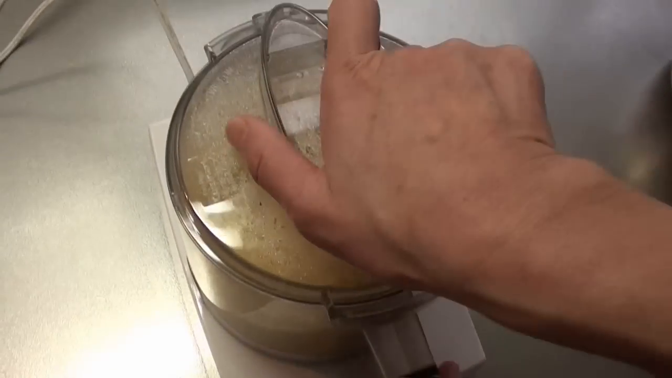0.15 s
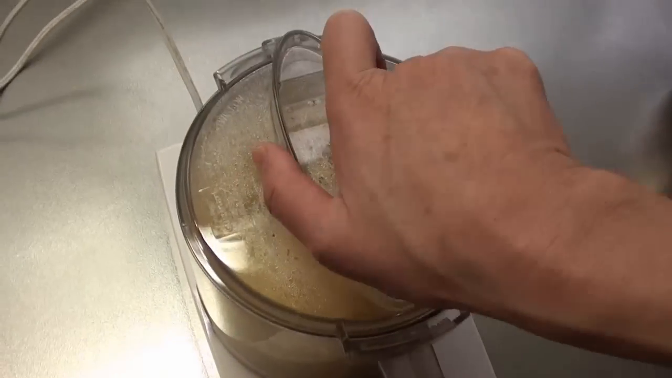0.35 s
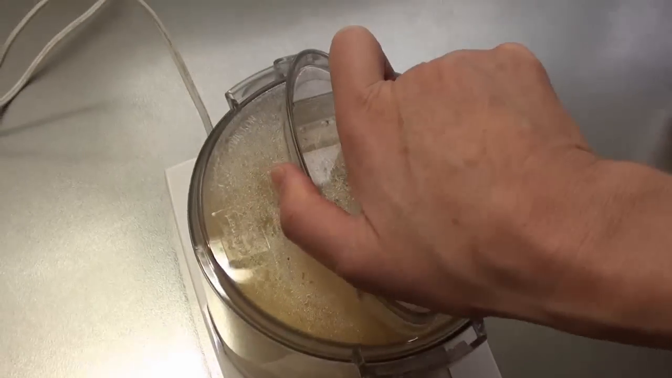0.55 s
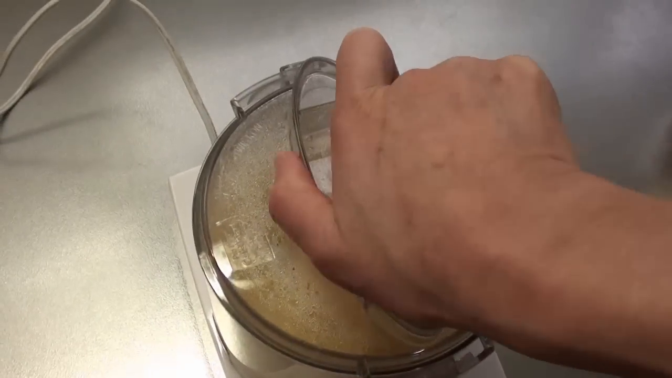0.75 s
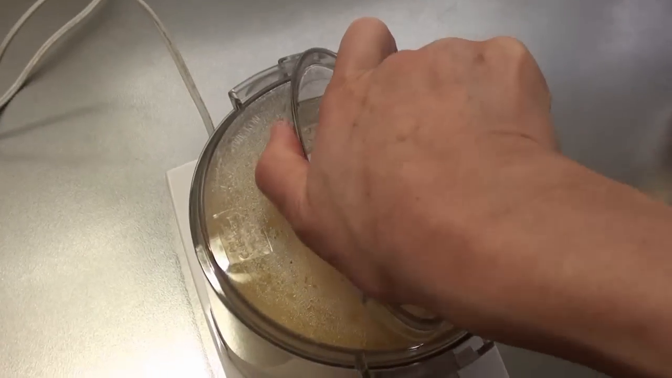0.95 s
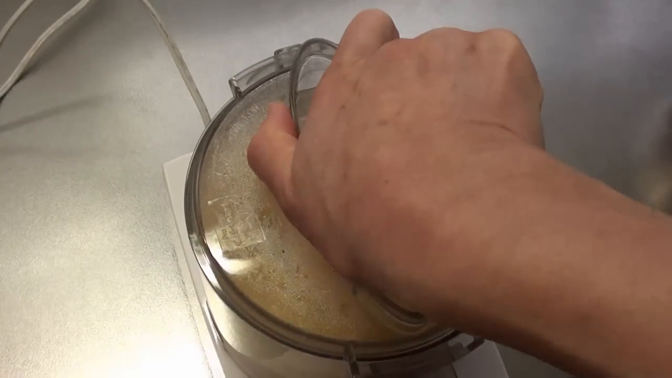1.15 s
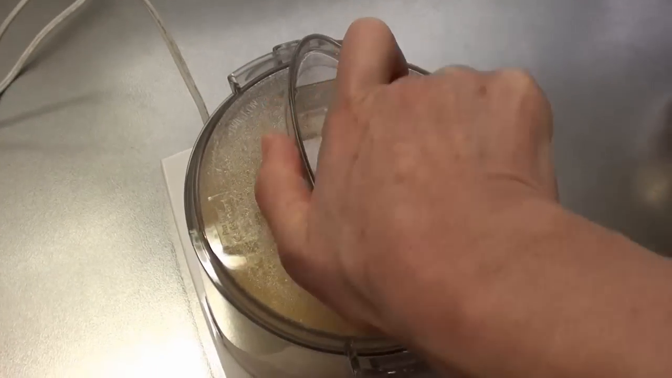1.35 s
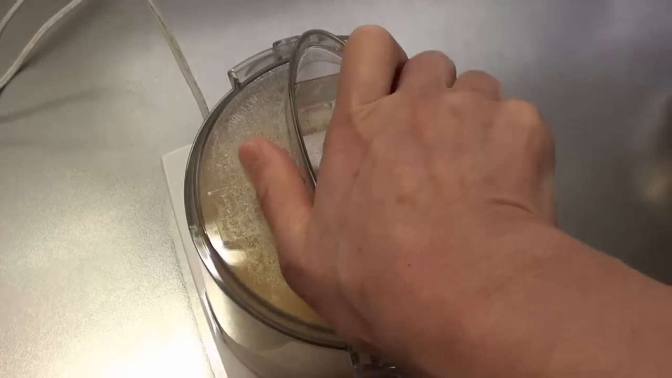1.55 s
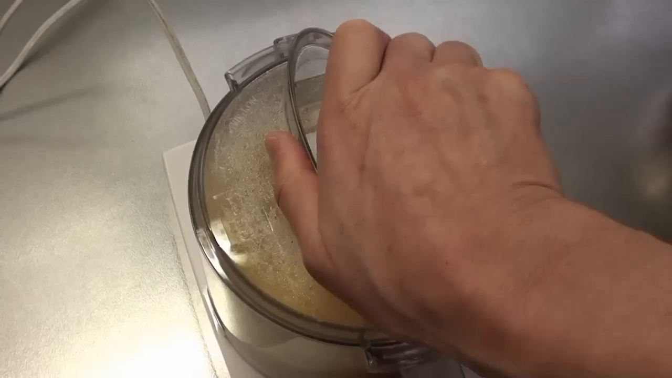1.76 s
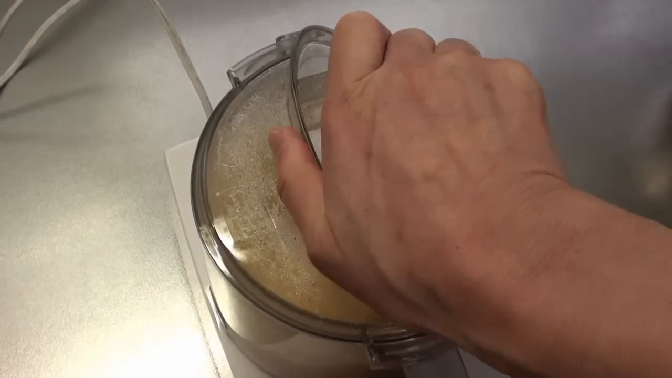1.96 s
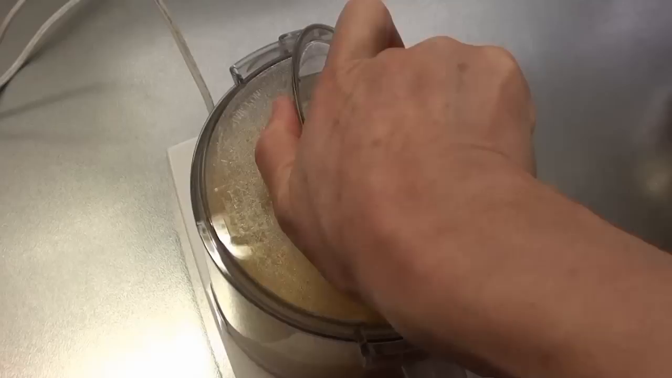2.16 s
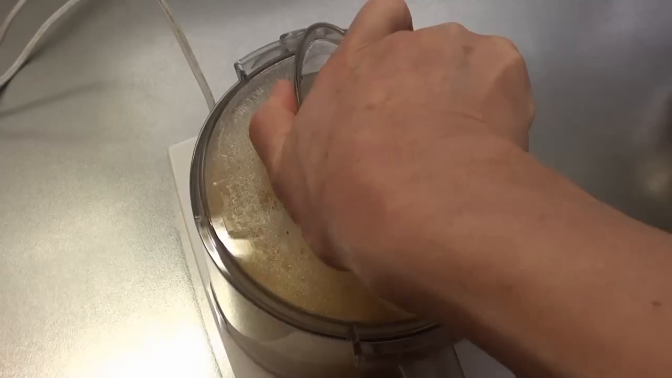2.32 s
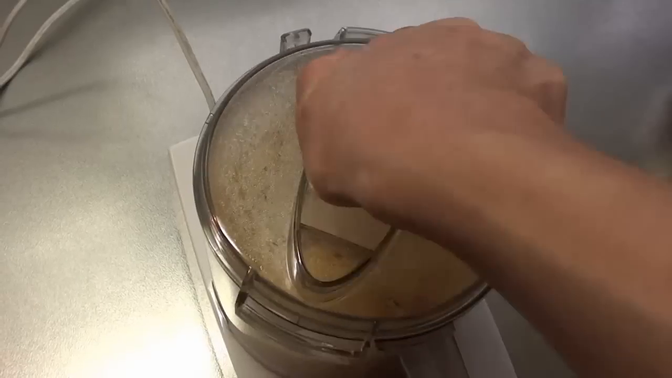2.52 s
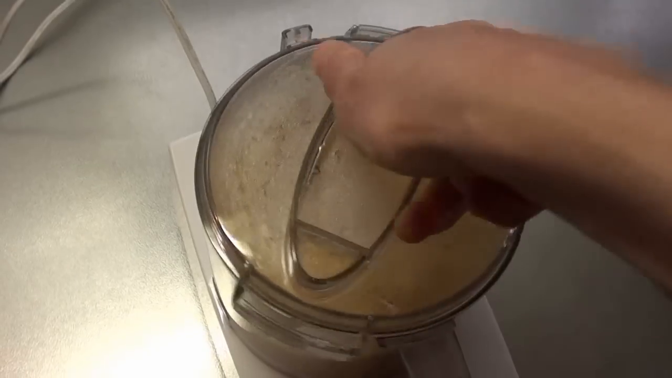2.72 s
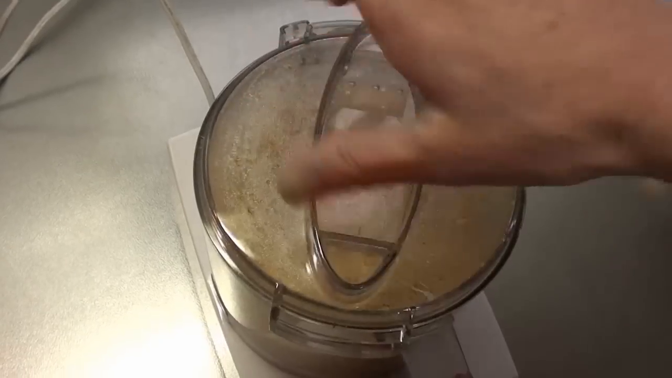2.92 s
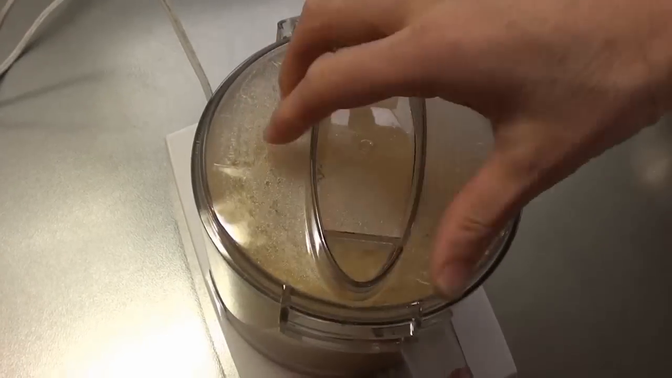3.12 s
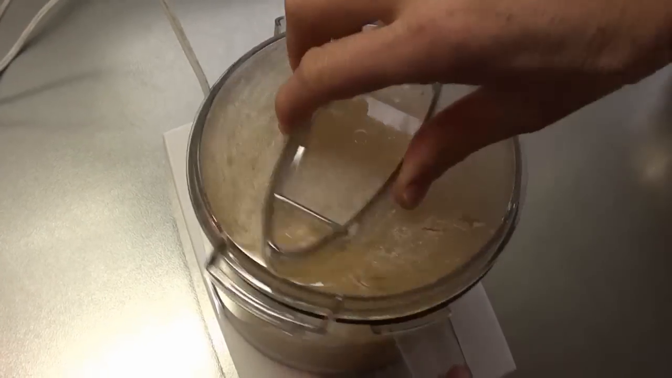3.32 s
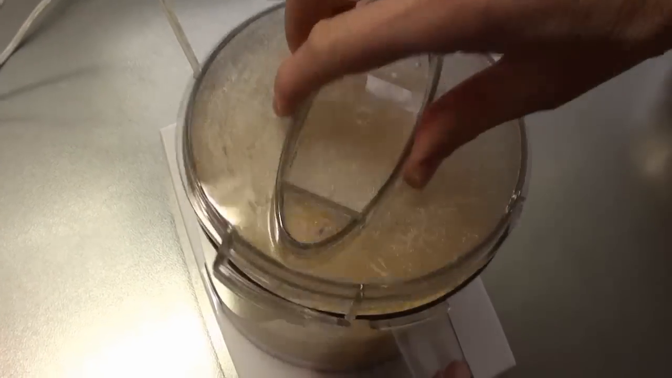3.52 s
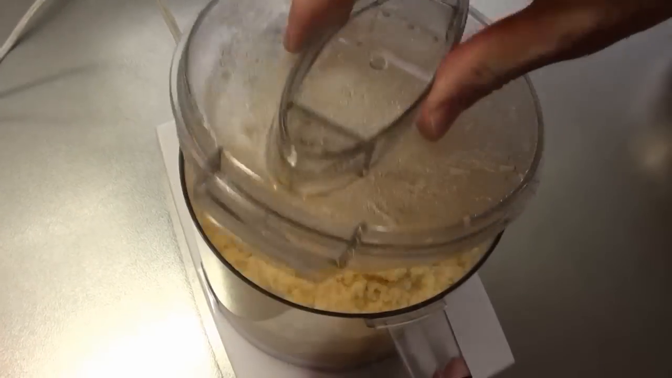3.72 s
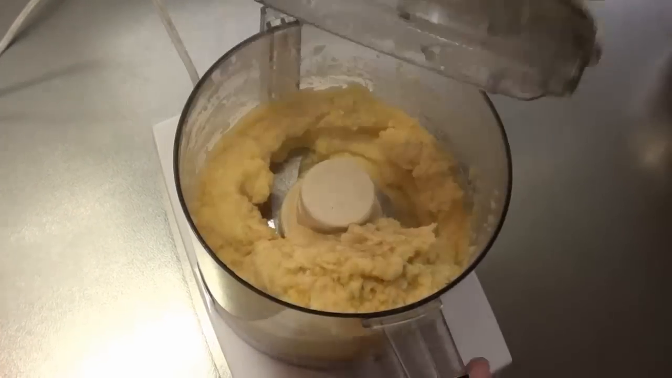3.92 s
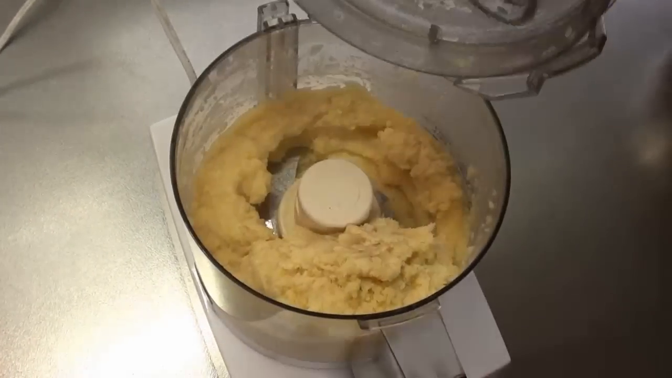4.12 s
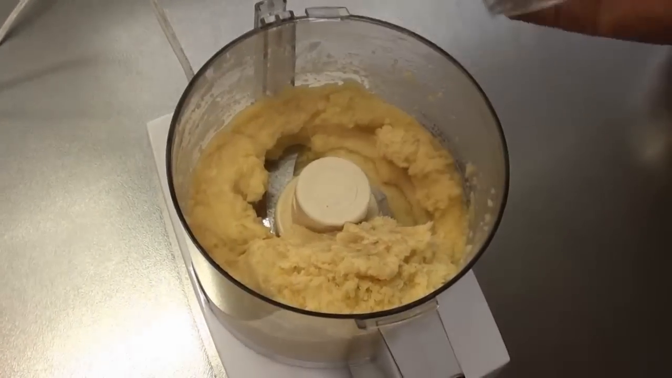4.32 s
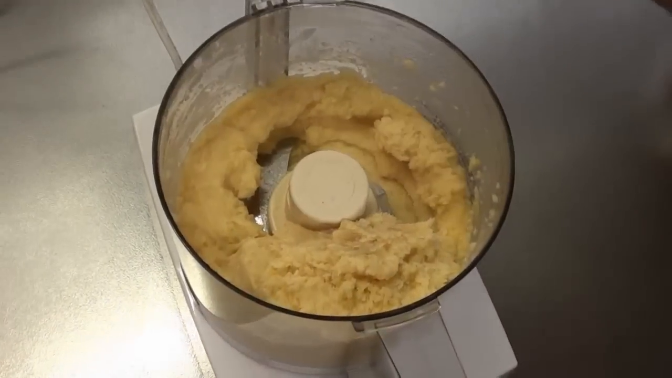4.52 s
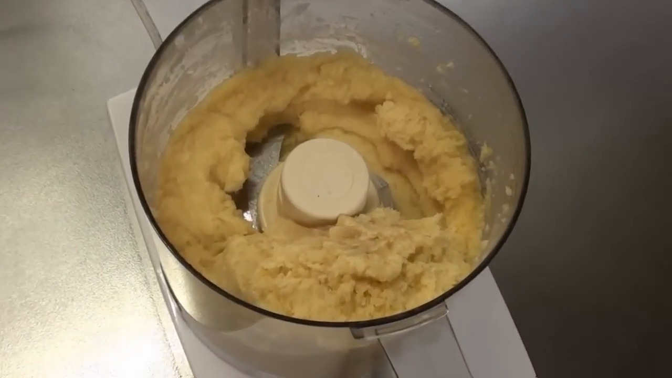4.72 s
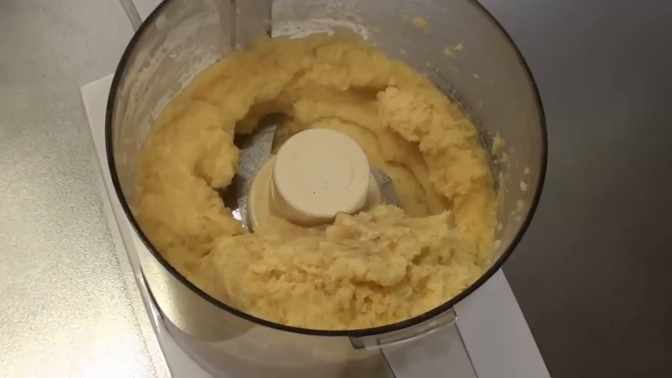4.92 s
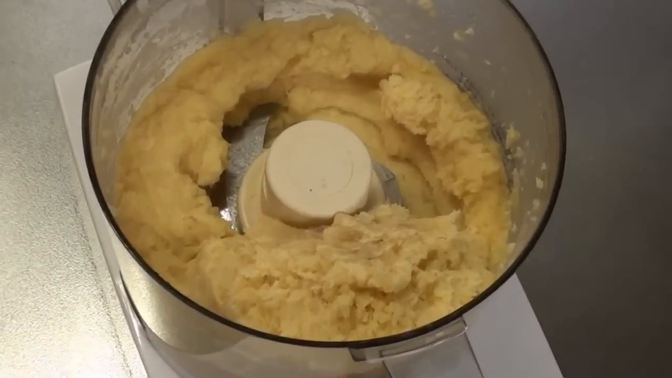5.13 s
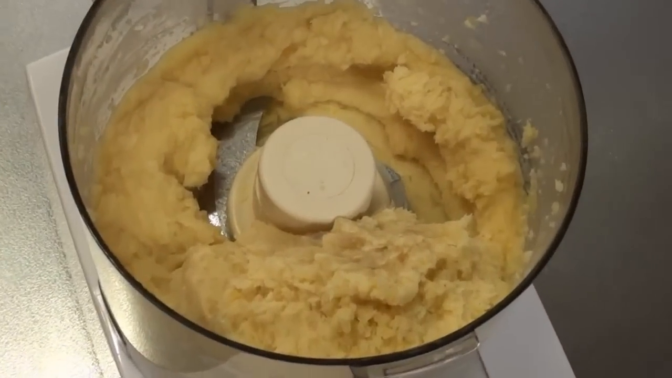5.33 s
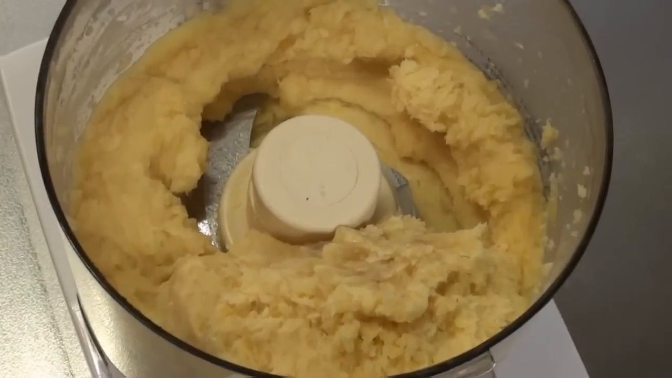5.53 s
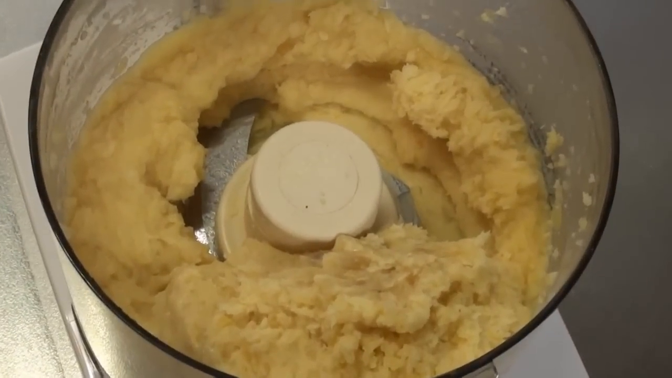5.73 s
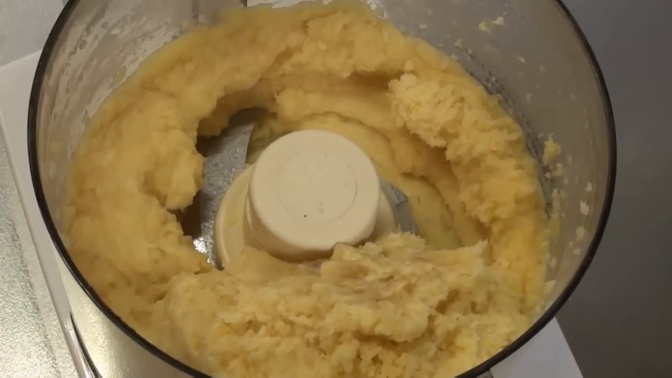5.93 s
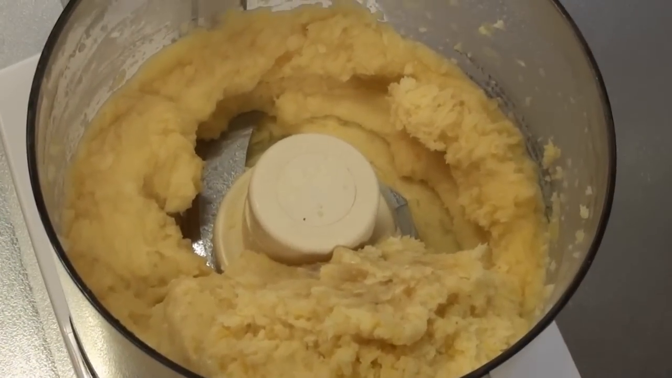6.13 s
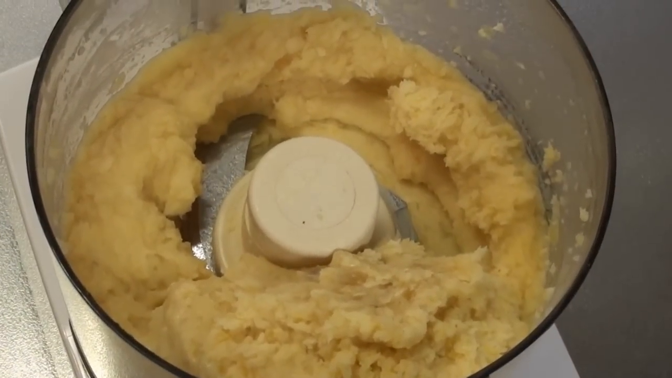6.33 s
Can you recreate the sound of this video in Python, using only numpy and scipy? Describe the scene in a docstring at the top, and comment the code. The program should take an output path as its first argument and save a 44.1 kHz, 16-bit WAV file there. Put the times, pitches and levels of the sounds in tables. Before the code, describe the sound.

Hard plastic knocks and short rim scrapes with tiny latch squeaks, ending in near silence over faint room hiss and appliance hum.

```python
"""In a quiet kitchen, a hand twists the plastic lid of a food processor off its latch and lifts it from the bowl.
Knocks and clicks are short blows with a dying rattle that set the tuned modes of lid and bowl ringing.
The scraping rim is a dense stream of uneven grains driving the same modes, and the latch squeaks by
stick-slip as a wavering stack of partials. Noise-like echoes make the room ring briefly, over a soft hiss
with faint, steady appliance tones."""
import sys
import numpy as np
from scipy import signal
from scipy.io import wavfile

SR = 44100
rng = np.random.default_rng(int(sys.argv[2]) if len(sys.argv) > 2 else 0)


def persist_wave(psi):
    """Save psi, clipped to +-1, as 16-bit WAV."""
    counts = np.round(np.clip(psi, -1, 1) * 32767).astype(np.int16)
    wavfile.write(sys.argv[1], SR, np.atleast_2d(counts).T)


def invert_db(x):
    """Field ratio 10**(x/20) for x, a level in decibels (scalar or array-like)."""
    u = np.asarray(x, float) / 20
    return 10 ** u


N = 280816
TIME = np.arange(N) / SR   # seconds

# Centres of the five ranges of pitch in which blows and grains are described. Each entry: frequency in Hz.
COLOUR_HZ = [250, 850, 2000, 4500, 8000]
SUDDEN_S, GENTLE_S = 0.0015, 0.0072   # a quick and a soft fade, in seconds


def rms_one(x):
    """Scale to an average strength (rms) of 1."""
    return x / np.sqrt(np.mean(x ** 2) + 1e-20)


def in_time(rows):
    """Turn rows of (seconds, value) into a curve over all samples."""
    return np.interp(TIME, *np.transpose(rows))


def sounding(start, length, rise_s, fall_s):
    """1 while the event lasts, with a fade before it and another after it."""
    end = start + length
    return np.interp(TIME, [start - rise_s, start, end, end + fall_s], [0, 1, 1, 0])


def at_hz(points, hz):
    """Read a curve of (Hz, value) at one frequency, with pitch on a logarithmic axis."""
    point_hz, values = np.transpose(points)
    return np.interp(np.log(hz), np.log(point_hz), values)


def drift(rate):
    """Random wandering of spread 1: noise through two equal one-pole low-passes at rate Hz."""
    r = np.exp(-2 * np.pi * rate / SR)
    noise = rng.standard_normal(N + SR)
    settled = signal.lfilter([1], [1, -2 * r, r * r], noise)[SR:]   # skip the first second
    return rms_one(settled)


def blend(ranges, hz):
    """Cross-fade between the five ranges of pitch to get the value at one frequency."""
    place = np.interp(np.log(hz), np.log(COLOUR_HZ), np.arange(5))
    k = min(int(place), 3)
    return ranges[k] + (place - k) * (ranges[k + 1] - ranges[k])


def ring(force, hz, t60):
    """One mode of a solid part: a unit click starts a sine of height 1 that falls 60 dB in t60 seconds."""
    r = invert_db(-60 / (max(t60, 0.0005) * SR))
    w = 2 * np.pi * hz / SR
    return signal.lfilter([0, np.sin(w)], [1, -2 * r * np.cos(w), r * r], force + 1e-18)


def room_tone():
    """Stereo hiss in half-octave bands, each with its own level and likeness, plus appliance tones."""
    # Colour of the hiss. Each row: frequency in Hz, relative density in dB.
    hiss_colour = [(15, -61), (25, -37), (60, -15.5), (90, -2.5), (118, -13), (202, -4.5), (237, -3.5),
                   (438, -7), (811, -8), (2240, -12.5), (2430, -13), (2630, -15), (4150, -13), (13800, -20),
                   (15000, -23)]
    # Loudness of the whole hiss. Each row: time in seconds, level in dB.
    hiss_level = [(0.0, -54), (1.5, -54), (3.6, -53.5), (6.37, -58)]
    # How alike left and right are. Each row: frequency in Hz, likeness (1 same, 0 unrelated, -1 opposite).
    likeness = [(60, 1), (180, 0.8), (550, 0.085), (1650, 0.15), (4970, 0.89), (15000, 0.77)]
    # Steady appliance tones. Each row: frequency in Hz, level in dB before a slight waver.
    tone_table = [(118.4, -73), (839.8, -76), (2519, -71), (8393, -77)]
    hiss, edges = 0, 22 * 2 ** np.arange(0, 9.6, 0.5)
    white = rng.standard_normal((2, 2, N))   # neighbouring bands use different noise
    for k, (low, high) in enumerate(zip(edges, edges[1:])):
        band = signal.butter(2, [low, high], "band", fs=SR, output="sos")
        mid, side = signal.sosfilt(band, white[k % 2])
        hz = np.sqrt(low * high)
        alike = np.clip(at_hz(likeness, hz), -1, 1)
        stereo = np.sqrt(1 + alike) * mid + np.sqrt(1 - alike) * side * [[1], [-1]]
        hiss = hiss + invert_db(at_hz(hiss_colour, hz)) * stereo
    level_db = in_time(hiss_level) + 0.18 * drift(4)
    waver = invert_db(0.87 * drift(6))
    tones = sum(np.sqrt(2) * invert_db(db) * np.sin(2 * np.pi * hz * TIME) for hz, db in tone_table)
    return invert_db(level_db) * rms_one(hiss) + waver * tones


def plastic():
    """Every knock is a blow plus a dying rattle; blows and friction drive the modes of bowl and lid."""
    # Plastic knocking on plastic. Each row: start in seconds, blow on the dome of the lid in dB,
    # push into the bowl in dB, hardness as treble gained in dB, snap of the latch tab near 4.5 kHz in dB.
    knocks = [(0.105, -31.5, -42.5, -7.5, -11), (0.287, -47.5, -45.5, 7, 6), (0.339, -40.5, -42, -1.5, -7),
              (0.402, -35.5, -43, -27, -16.5), (0.412, -43, -50, -14, -8.5), (0.44, -55, -44, -13, -15),
              (0.509, -55, -45, -15, -16), (0.545, -61, -46.5, -12, -9), (0.57, -59, -46, -12, -13),
              (0.634, -42, -46, -16, -20), (0.708, -43, -50, -16, -13), (0.734, -62, -46, -9, -13),
              (0.753, -60, -44, -10, -12), (0.768, -54, -47, -8, -8), (0.802, -41, -49, 9, 9),
              (0.806, -27.5, -36, 5.5, 10), (0.829, -13.5, -23, -4.5, -11.5), (0.913, -35.5, -39, -7.5, -3),
              (0.99, -28.5, -36, -8, 4.5), (1.085, -28, -37.5, -1, 11.5), (1.276, -37.5, -43, -21, -7),
              (1.37, -23.5, -35.5, 0.5, -6), (1.426, -29.5, -40, -4.5, -5), (1.474, -46, -46, -1, 5),
              (1.66, -51, -50, -4, 1), (1.681, -37, -38, 0, -7), (1.701, -25.5, -31.5, -4, -3),
              (1.721, -29.5, -35.5, 13, 16), (1.755, -23.5, -28.5, 1, 11), (1.785, -21.5, -28, -9, -10),
              (1.933, -23, -38, -5.5, 1), (1.961, -33, -44, -9, -10), (2.095, -26.5, -46, -8, -5),
              (2.144, -29, -40, -2.5, -13), (2.153, -22, -29.5, 1, -13), (2.192, -41, -44, -16, -7),
              (2.211, -35.5, -43, -13, 4), (2.235, -26, -50, -19, 9.5), (2.267, -26, -52, -5, 13),
              (2.35, -17, -35.5, -8.5, 6.5), (2.533, -27.5, -33, -4, 9), (2.567, -20, -22.5, -1, -6),
              (2.704, -30, -32.5, -11, -10), (2.787, -29.5, -35.5, -5.5, -2), (2.808, -26, -36, -11, -20),
              (2.831, -8.5, -25.5, -15.5, -9), (2.905, -37, -38, -6, 0), (2.977, -50, -47, 4, -6),
              (3.008, -37.5, -37.5, 2, -16), (3.09, -44.5, -51, -7, -2), (3.151, -14, -19.5, -28, -17.5),
              (3.259, -45, -48, -8, -9), (3.279, -26, -26, -15, -8), (3.291, -14, -25, -17, -13),
              (3.373, -22.5, -33, -11, -7), (3.431, -26, -36, -7.5, -22), (3.456, -29, -44, -20, -20),
              (3.488, -20, -35.5, -18, -13.5), (3.574, -46, -53, -15, -16), (3.596, -41, -48, 3.5, -2),
              (3.614, -46, -51, 4, -9), (3.859, -32, -55, -28, -16.5), (3.937, -42, -38, 0, -19),
              (3.943, -51, -45, 17, -20), (3.965, -39.5, -41, 3, -17), (5.24, -60, -69, -4, 12),
              (5.779, -53, -57, -2, 4)]
    # Modes of the bowl. Each row: frequency in Hz, relative level in dB, time to fall 60 dB in seconds,
    # gain in dB on the driving force for a fully free lid.
    bowl_modes = [(97.8, -27.5, 0.091, 14), (176, -11, 0.015, 5), (224.8, 3.5, 0.12, -5),
                  (273, 3, 0.047, -3.5), (360.3, -3, 0.079, 11.5), (454, -6, 0.16, 0)]
    # Modes of the lid, sharp ones first, then broad ones of the damped contact.
    # Each row: frequency in Hz, relative level in dB, longest time to fall 60 dB in seconds.
    lid_modes = [(551, -7, 0.046), (665, -4.5, 0.048), (825, -8, 0.013), (837.4, -3, 0.045),
                 (1025, -15.5, 0.039), (1304, -3.5, 0.029), (1434, -3, 0.028), (1630, -18.5, 0.018),
                 (1894, -3, 0.032), (2160, -6.5, 0.019), (2695, 1, 0.031), (2790, 2, 0.022),
                 (3230, -2.5, 0.0073), (3780, 4.5, 0.0092), (4077, -2.5, 0.0096), (4640, -2, 0.0043),
                 (5377, -1, 0.0055), (5860, -4, 0.0029), (6850, 2.5, 0.017), (6900, -1.5, 0.021),
                 (7750, -5, 0.0026), (8520, -2, 0.02), (773, 6, 0.0073), (1889.4, 7.5, 0.0095),
                 (3530, 8.5, 0.0023), (6240, 3.5, 0.001), (8600, 3.5, .0012)]
    # How loose the lid is. Each row: time in seconds, looseness (0 latched, 1 free).
    looseness = [(0.9, 0.26), (2.0, 0.31), (2.6, 0.63)]
    # How well a blow reaches the five ranges of pitch. Each entry: gain in dB.
    blow_coupling = [3, -1, -3.5, 1, 8.5]
    # Shares that the modes near 2 kHz take. The entries: share of the hardness, share of the snap.
    rim_shares = [0.14, 0.25]
    rattle_s = 0.0018   # time constant of the chatter after a knock
    held_cycles = 30   # the hand stops any lid mode within this many cycles

    s, dome_db, push_db, hard_db, snap_db = np.transpose(knocks)
    rim_db = dome_db + np.dot(rim_shares, [hard_db, snap_db])
    colour_db = np.array([push_db, dome_db, rim_db, dome_db + snap_db, dome_db + hard_db])
    colour_db = colour_db + np.c_[blow_coupling]

    at = np.round(s * SR).astype(int)
    last = np.maximum(np.searchsorted(at, np.arange(N), "right") - 1, 0)   # the latest knock
    age, lasting = np.arange(N) - at[last], rattle_s * SR   # in samples
    blow = 1.0 * (age == 0)
    dying = (age >= 0) * np.exp(-np.abs(age) / lasting)
    rattle = 2.01 * dying * rng.standard_normal(N) / np.sqrt(lasting)

    # each knock lands at another spot, so it drives each mode a little differently (dB)
    spread = rng.normal(0, 1.8, (len(at), len(lid_modes) + len(bowl_modes)))
    drag = friction()
    free = in_time(looseness)
    bowl, lid = 0, 0
    for k, (hz, level_db, t60, gain_db) in enumerate(bowl_modes):
        strength = invert_db(colour_db[0] + spread[:, k])[last]
        force = strength * (blow + 0.17 * rattle) + drag[0]
        bowl = bowl + invert_db(level_db) * (-1) ** k * ring(force * invert_db(gain_db * free), hz, t60)
    for k, (hz, level_db, t60) in enumerate(lid_modes):
        strength = invert_db(blend(colour_db, hz) + spread[:, -1 - k])[last]
        force = strength * (0.55 * blow + rattle) + blend(drag, hz)
        lid = lid + invert_db(level_db) * (-1) ** k * ring(force, hz, min(t60, held_cycles / hz))

    heavy = np.exp(-2 * np.pi * 250 / SR)   # the heavy bowl takes a moment to get going
    bowl = signal.lfilter([1 - heavy], [1, -heavy], bowl)
    bowl = signal.lfilter(*signal.butter(2, 95, "high", fs=SR), bowl)
    lid = signal.lfilter(*signal.butter(3, 350, "high", fs=SR), lid)   # the thin lid radiates no bass
    return 0.96 * bowl + lid


def friction():
    """Dense uneven grains of the dragging rim, with their strength in five ranges of pitch."""
    # The rim drags on and dies away. Each row: start in seconds, length in seconds, pressure in dB,
    # tilt towards treble in dB per octave, weight on the bowl in dB.
    drags = [(0.811, 0.017, -29, 8.5, -53), (0.834, 0.033, -42, -8, -26.5), (1.088, 0.069, -28, 2, -38),
             (1.283, 0.074, -60.5, -7, -29.5), (1.707, 0.008, -29.5, 2, -44),
             (1.727, 0.048, -40.5, 8.5, -54), (1.757, 0.065, -25.5, -0.5, -24),
             (2.11, 0.015, -59, -19, -37), (2.16, 0.012, -36, -2.5, -26), (2.242, 0.0058, -22.5, -3.5, -57),
             (2.274, 0.046, -28.5, 1.5, -44), (2.358, 0.067, -29.5, -1.5, -52.5),
             (2.536, 0.076, -19, 2, -40), (2.575, 0.12, -28.5, 1, -35.5), (2.793, 0.028, -33.5, 3, -38.5),
             (2.837, 0.052, -27.5, -2, -28.5), (2.98, 0.064, -49.5, 3, -43.5),
             (3.158, 0.013, -24, -7, -51.5), (3.298, 0.013, -24.5, -3.5, -24),
             (3.382, 0.062, -37.5, 1, -26), (3.432, 0.017, -41, 1, -36), (3.614, 0.026, -52, 0.5, -61.5),
             (3.935, 0.065, -60, 9, -70)]
    # The rim slides ever more strongly into a stop. Each row: start in seconds, length in seconds,
    # pressure at the end in dB, tilt towards treble in dB per octave, weight on the bowl at the end in dB.
    slides = [(0.77, 0.037, -51, 7, -40), (1.05, 0.053, -49.5, 5.5, -48.5), (1.345, 0.042, -45.5, 0.5, -42),
              (2.12, 0.044, -58, 10, -36), (2.515, 0.016, -37, 1, -55.5), (2.808, 0.036, -31, -3.5, -38.5),
              (3.12, 0.023, -53.5, 1.5, -37), (3.25, 0.018, -47.5, 0, -46), (3.35, 0.034, -41.5, 0, -29),
              (3.56, 0.064, -52, -2, -40)]
    # Level lost over one drag, low to high range. Each entry: change in dB.
    drag_fade = [10, 7.4, 14, 19, 14]
    # Level gained over one slide, low to high range. Each entry: change in dB.
    slide_swell = [3, 6.7, 11, 12, 7.6]
    # How well the grains reach the five ranges of pitch. Each entry: gain in dB.
    grain_coupling = [-30.5, -23, -20.5, -17.5, -14.5]
    rasp_follows_weight = 0.23   # the low lid modes follow the weight on the bowl by this share

    levels = np.zeros((5, N))
    octaves = np.log2(np.array(COLOUR_HZ) / COLOUR_HZ[2])
    # loudest: 0 at the start of the event, 1 at its end
    # a drag sets in at once and trails off, a slide creeps in and stops dead
    for rows, change_db, loudest, rise_s, fall_s in (
            (drags, drag_fade, 0, SUDDEN_S, GENTLE_S), (slides, slide_swell, 1, GENTLE_S, SUDDEN_S)):
        for s, length, db, tilt_db, weight_db in rows:
            span = slice(int((s - 0.02) * SR), int((s + length + 0.02) * SR))
            progress = np.clip((TIME[span] - s) / length, 0, 1)
            away = np.abs(progress - loudest)
            top_db = np.r_[weight_db, db + tilt_db * octaves[1:]] + grain_coupling
            top_db[1] += rasp_follows_weight * (weight_db - db)
            level_db = top_db[:, None] - np.outer(change_db, away)
            levels[:, span] += sounding(s, length, rise_s, fall_s)[span] * invert_db(level_db)
    sizes = invert_db(0.59 * np.minimum(rng.exponential(1, N), 5)) * rng.choice([-1, 1], N)
    grains_per_s = 4000 * invert_db(3.0 * drift(60))
    grains = sizes * (rng.random(N) < grains_per_s / SR)
    return levels * rms_one(grains)


def squeaks():
    """Nearly regular slips give a harmonic stack that wavers in pitch; each partial flickers on its own."""
    # Stick-slip squeaks of the latch. Each row: start in seconds, length in seconds,
    # slips per second at the start in Hz before the waver, level in dB, number of the partial that the tab favours.
    squeak_table = [(1.084, 0.015, 1449, -23.5, 1.95), (1.752, 0.029, 1406, -26, 3.3),
                    (2.2705, 0.012, 1363, -25, 2.06), (2.534, 0.045, 1363, -26, 2.4)]
    # Partials from the lowest up. Each entry: relative level in dB.
    partials = [1, 0, -5, -4.5, -9, -16]
    attack_s, rise_db, fade_db = 0.006, 5.5, 11.5   # each squeak swells, then fades
    sag_hz_per_s = 400   # slips slow down as the latch lets go
    favour_db, favour_width = 7, 1   # lift of the favoured partial, reach in partials
    after_db_per_s = 504   # the tab goes on trembling faintly and dies at this rate
    upper_fade_db_per_s = 32   # each higher partial dies this much faster

    out, unsteady = 0, drift(150)
    flicker = [invert_db(3.5 * drift(140)) for _ in partials]
    for s, length, hz, db, favoured in squeak_table:
        since = TIME - s
        age = np.clip(since, 0, length)
        effort_db = np.interp(age, [0, attack_s, length], [-rise_db, 0, -fade_db])
        effort_db = effort_db - after_db_per_s * np.maximum(since - length, 0)
        slip_hz = (hz - sag_hz_per_s * age) * (1 + 0.014 * unsteady)
        phase = 2 * np.pi * np.cumsum(slip_hz) / SR
        stack = 0
        for k, level_db in enumerate(partials):
            lift_db = favour_db * np.exp(-((k + 1 - favoured) / favour_width) ** 2)
            partial_db = level_db - k * upper_fade_db_per_s * np.maximum(since, 0) + lift_db
            stack = stack + invert_db(partial_db) * flicker[k] * np.sin((k + 1) * phase)
        # the one-second window leaves room for the trembling to die
        window = sounding(s, 1, SUDDEN_S, GENTLE_S)
        out = out + np.sqrt(2) * window * invert_db(db + effort_db) * stack
    return out


def kitchen(x):
    """Dense echoes as dying noise, partly alike left and right; quick ones off the counter are opposite."""
    # How long the room rings. Each row: frequency in Hz, time to fall 60 dB in seconds.
    ring_times = [(200, 0.33), (1000, 0.28), (4000, 0.24), (10000, 0.17)]
    walls_db, counter_db = -9.5, -9
    t = np.arange(SR // 2) / SR
    white = rng.standard_normal((3, len(t)))
    tail = 0
    for low in 100 * 2.0 ** np.arange(7):   # octave bands
        octave = signal.butter(2, [low, 2 * low], "band", fs=SR, output="sos")
        dying = invert_db(-60 * t / at_hz(ring_times, low * np.sqrt(2)))
        tail = tail + signal.sosfilt(octave, white) * dying
    tail = tail * (1 - np.exp(-t / 0.00063))   # the echoes take a moment to build up
    tail = invert_db(walls_db) * (tail[:2] + 0.54 * tail[1::-1]) / np.linalg.norm(tail[0])
    quick = white[2] * np.exp(-t / 0.003)
    # long waves reach both sides alike, so the opposite part has little bass
    quick = signal.lfilter(*signal.butter(2, 500, "high", fs=SR), quick)
    quick = invert_db(counter_db) * quick / np.linalg.norm(quick) * [[1], [-1]]
    return signal.fftconvolve(x[None], tail + quick, axes=1)[:, :N]


def scene():
    """Lid and bowl close in front; the latch faces away and reaches the walls more; little top treble."""
    latch_away_db = 4   # extra squeak sent to the walls
    dull = signal.butter(8, 10300, fs=SR, output="sos")
    knocks, squeal = signal.sosfilt(dull, [plastic(), squeaks()])
    walls = kitchen(knocks + invert_db(latch_away_db) * squeal)
    direct = (knocks + squeal) * invert_db([[-0.2], [0.2]])   # slightly stronger on the right
    return direct + walls + room_tone()


def band_limit(x):
    """A steep low-pass at the top of the band."""
    return signal.sosfilt(signal.butter(12, 15760, fs=SR, output="sos"), x)


def record(dry):
    """Peaks are rounded softly, then the treble above about 15 kHz is cut."""
    rounded = 0.69 * np.tanh(dry / 0.66)
    top_cut = signal.cheby2(12, 60, 15100, fs=SR, output="sos")
    mix = signal.sosfilt(top_cut, rounded)
    return band_limit(mix)


dry = scene()
out = record(dry)
persist_wave(out)
```